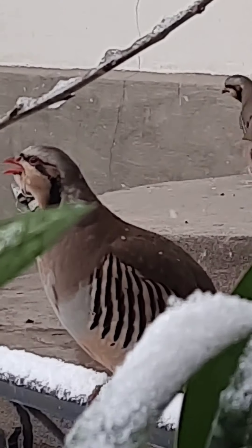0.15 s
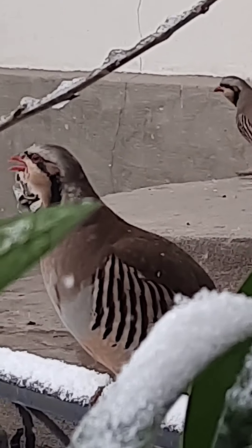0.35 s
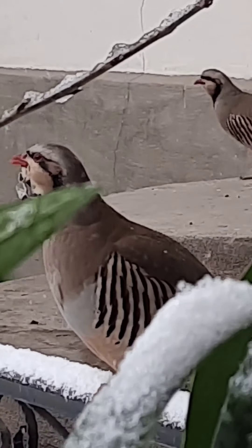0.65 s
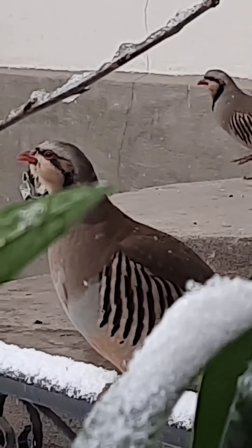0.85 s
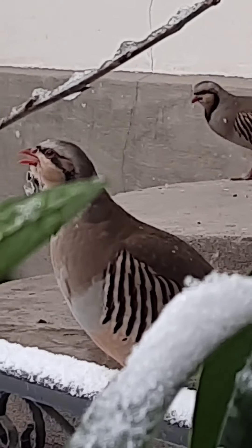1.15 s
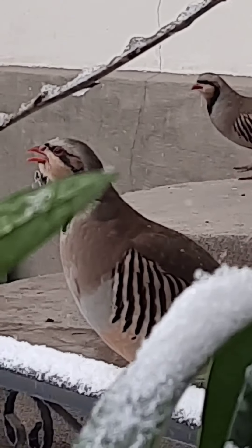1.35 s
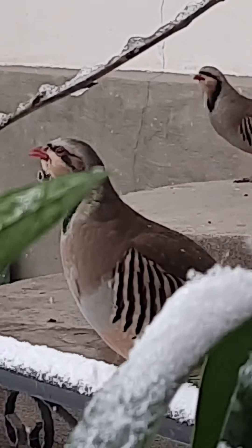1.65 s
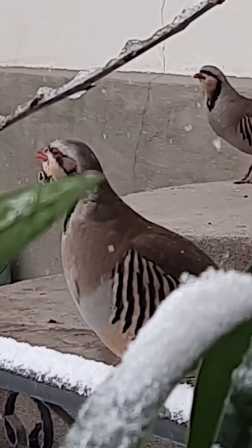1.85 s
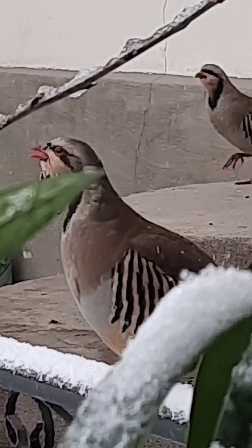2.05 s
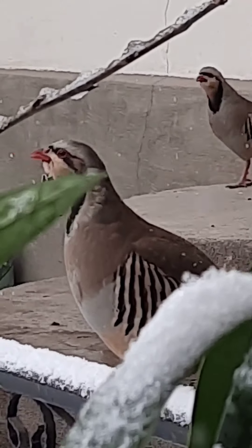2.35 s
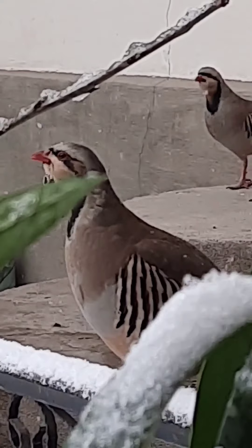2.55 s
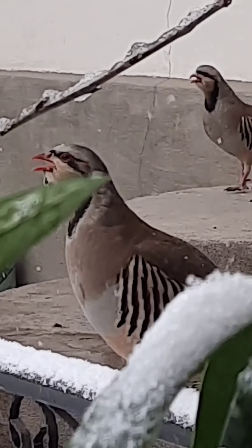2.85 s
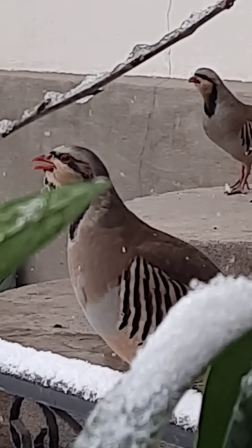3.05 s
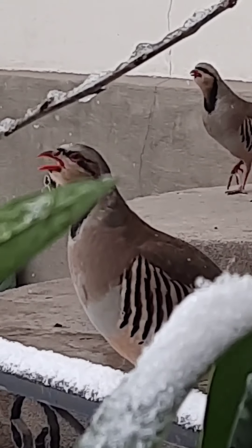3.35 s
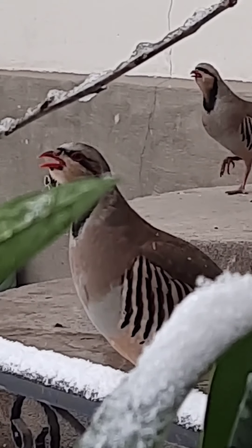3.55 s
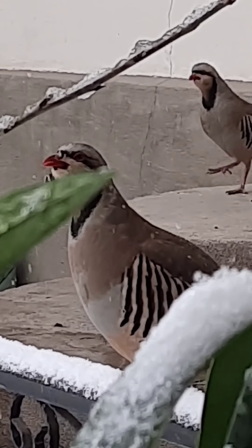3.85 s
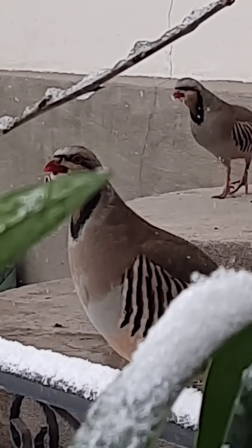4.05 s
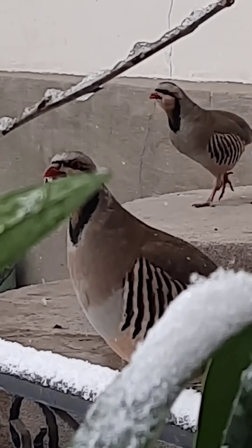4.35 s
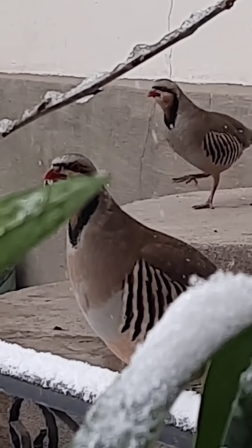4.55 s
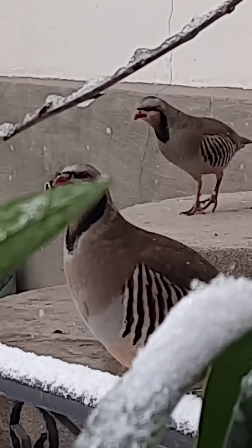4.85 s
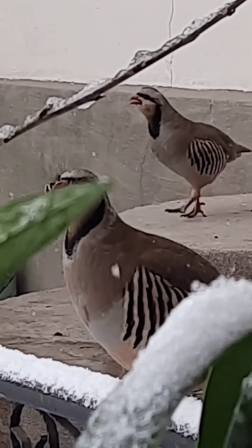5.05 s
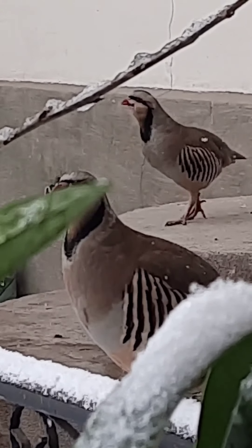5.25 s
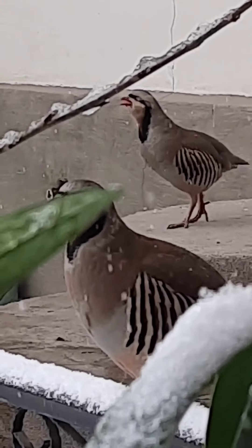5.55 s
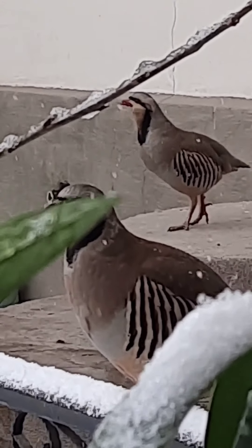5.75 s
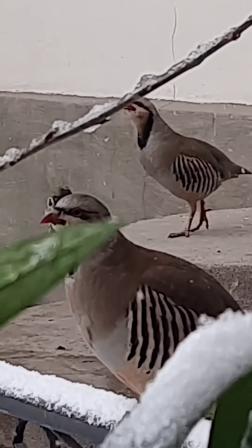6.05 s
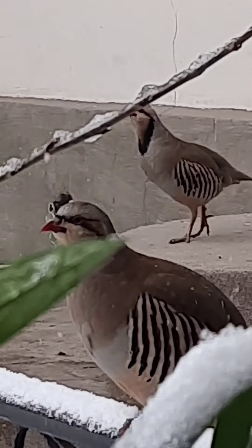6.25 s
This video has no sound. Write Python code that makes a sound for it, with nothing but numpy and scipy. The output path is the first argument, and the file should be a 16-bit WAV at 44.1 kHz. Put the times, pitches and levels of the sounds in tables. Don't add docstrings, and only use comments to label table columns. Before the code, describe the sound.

Outdoors in a snowy, concrete-walled yard, a partridge very near the microphone clucks fast and regularly, starting mid-call with harsh and hoarse chuks, then mixing in clear, whistly double notes. A second partridge farther off joins from about 1.7 seconds, lower and duller. The near bird stops around 4.4 seconds; the distant one continues alone to the end with faint small-bird chirps. Walls return short echoes over a very quiet low rumble.

```python
import sys
import numpy as np
from scipy import signal
from scipy.fft import rfft, irfft, next_fast_len
from scipy.io import wavfile
from scipy.ndimage import uniform_filter1d

SR = 44100
rng = np.random.default_rng(int(sys.argv[2]) if len(sys.argv) > 2 else 0)


def makeup_ratio(level_db):
    decades = np.asarray(level_db, float) / 20
    return 10 ** decades


def persist_wave(psi):
    counts = np.round(np.clip(psi, -1, 1) * 32767).astype(np.int16)
    wavfile.write(sys.argv[1], SR, np.atleast_2d(counts).T)


N = 282316
LEAD = 8192

# start_s [s], effort_db [dB], length_s [s], beak [throat factor], pitch_hz [Hz]
CLEAR_NOTES = [
    (1.2343, -13.5, 0.039, 1.05, 628),
    (1.6465, -14, 0.03, 1.04, 625),
    (2.0988, -12.5, 0.031, 1.1, 625.8),
    (2.5319, -12, 0.031, 1.16, 625.5),
    (2.966, -12.5, 0.036, 1.146, 624.7),
    (3.411, -15, 0.036, 1.033, 616),
    (3.8696, -12, 0.04, 1.11, 606),
    (4.3154, -10.5, 0.025, 1.15, 622),
]
# start_s [s], effort_db [dB], length_s [s], beak [factor], pitch_hz [Hz]
SECOND_PUSHES = [
    (1.2805, -17.5, 0.036, 0.95, 611),
    (1.705, -29.5, 0.055, 0.98, 596),
    (2.155, -18.5, 0.034, 0.93, 610.4),
    (2.584, -12, 0.032, 1.1, 634.6),
    (3.025, -11.5, 0.025, 1.097, 621),
    (3.473, -19, 0.0279, 1.04, 607.5),
    (3.933, -18, 0.023, 0.87, 615.6),
    (4.3676, -9.5, 0.019, 1.15, 604),
]
# start_s [s], effort_db [dB], length_s [s], beak [throat factor], pitch_hz [Hz]
HOARSE_NOTES = [
    (0.483, -15, 0.045, 1.067, 631),
    (0.672, -14.5, 0.04, 1.06, 635),
    (0.8592, -13.5, 0.038, 1.1, 633.7),
    (1.056, -14, 0.029, 0.99, 637.4),
    (1.478, -14.5, 0.0304, 1.03, 629),
    (1.741, -12.5, 0.027, 1.06, 642),
    (3.5, -14, 0.022, 1.16, 645),
]
# start_s [s], effort_db [dB], length_s [s], beak [throat factor], pitch_hz [Hz]
HARSH_NOTES = [
    (-.088, -13, 0.045, 1.004, 643),
    (0.1162, -13.5, 0.034, 1.01, 627),
    (0.294, -13.5, 0.043, 1.046, 632.5),
    (1.925, -12, 0.02, 1.19, 635.7),
    (2.366, -11, 0.021, 1.12, 636.3),
    (2.797, -12, 0.026, 1.113, 653),
    (3.236, -12, 0.0195, 1.07, 649),
    (3.697, -10.5, 0.016, 1.126, 634),
    (4.14, -9, 0.016, 1.147, 646.3),
]
# centre_hz [Hz], width_hz [Hz], level_db [dB]; brightness acts from the third on
NEAR_RESONANCES = [(1832, 373, 4), (1140, 1200, -18.5), (4740, 864, -9), (2448, 413, -4.5),
                   (3146, 82, -14.5), (8290, 1330, -34), (10360, 610, -33), (13550, 810, -30.5),
                   (621, 240, -10.5)]
# start_s [s], effort_db [dB], length_s [s], brightness_db [dB], pitch_hz [Hz]
FAR_ANSWERS = [(1.6962, -30, 0.027, -11, 544), (1.971, -31.5, 0.03, -9.5, 547),
               (2.2496, -34, 0.04, -6, 544.6), (2.445, -31.5, 0.022, -3, 479.5),
               (2.729, -34.5, 0.038, -3, 477), (2.948, -35, 0.034, -1, 464),
               (3.129, -40.5, 0.092, -5.5, 484.3), (3.234, -33, 0.058, -6.5, 516.6),
               (3.457, -30, 0.033, -3.5, 480.7), (3.733, -30.5, 0.04, -6, 481),
               (3.946, -26.5, 0.023, -4.5, 496), (4.156, -33.5, 0.033, -4.5, 477.5),
               (4.243, -32, 0.037, 0.5, 495.5), (4.459, -33, 0.04, -2.5, 502),
               (4.748, -29.5, 0.044, -2, 537), (4.954, -31, 0.047, -4, 515.6),
               (5.233, -30.5, 0.022, -13, 460), (5.2647, -32.5, 0.033, 0.5, 472.7),
               (5.492, -30.5, 0.0484, -2.5, 518.7), (5.723, -31.5, 0.046, -9.5, 490),
               (5.818, -34.5, 0.047, 2, 472.5), (6.043, -31, 0.054, -1.5, 492.2),
               (6.154, -34, 0.039, -26, 482.4), (6.1915, -33.5, 0.054, -14, 483.2),
               (6.277, -44.5, 0.024, 5, 465), (6.358, -36.5, 0.089, 9, 521.4),
               (6.386, -27.5, 0.041, -6, 528)]
# start_s [s], effort_db [dB], length_s [s], brightness_db [dB], pitch_hz [Hz]
FAR_LEAD_INS = [
    (3.648, -36, 0.024, 0.5, 565.4),
    (4.6616, -38, 0.029, -0.5, 558.7),
    (5.174, -38.5, 0.037, -2, 548.5),
    (5.99, -34.5, 0.023, -9, 612),
]
# centre_hz [Hz], width_hz [Hz], level_db [dB]; brightness acts from the third on
FAR_RESONANCES = [(1456, 351, 4), (636, 500, -26), (3650, 460, 0.5), (2440, 110, -8.5), (5500, 1230, -10.5),
                  (8500, 600, -26.5), (11460, 1380, -24.5)]
# start_s [s], level_db [dB], length_s [s], first_pitch_hz [Hz], last_pitch_hz [Hz]
SMALL_BIRD_CHIRPS = [
    (4.052, -47, 0.02, 5070, 4223),
    (4.769, -45.5, 0.044, 4870, 4350),
    (5.229, -46, 0.032, 4910, 4410),
    (5.402, -53.5, 0.025, 5000, 4240),
    (5.86, -53, 0.063, 4720, 4420),
    (6.161, -47.5, 0.045, 5020, 4280),
]
# frequency_hz [Hz], left_minus_right_db [dB]
NEAR_BALANCE = [(60, 8), (110, 16), (200, -24), (380, -3), (700, -1.5), (1280, 0.5), (2370, -7.5),
                (4370, -5), (8050, -2), (14900, 45)]
# frequency_hz [Hz], left_minus_right_db [dB]
FAR_BALANCE = [(60, -21), (110, -24), (200, 92), (380, -9.5), (700, 6.5), (1280, -4), (2370, -7.5),
               (4370, -0.5), (8050, -2.5), (14900, 56)]
# delay_s [s], left_db [dB], right_db [dB]
WALL_ECHOES = [(.004, 16, 0.5), (.009, 6.5, 14), (0.016, 7.5, 8), (0.022, 12, 10.5), (0.046, -4, 0)]
# frequency_hz [Hz], t60_s [s]
YARD_DECAY = [(300, 0.41), (1000, 1), (2000, 0.72), (4000, 0.71), (8000, 0.63), (14000, 0.37)]
# time_s [s], level_db [dB]
RUMBLE_SWELL = [(0.0, -59), (0.03, -70.5), (1.66, -73), (2.011, -67), (2.28, -72), (3.64, -73),
                (3.69, -44.5), (4.22, -67), (4.299, -104), (4.401, -70), (5.47, -75), (5.781, -55),
                (5.88, -67), (6.08, -54.5), (6.22, -68), (6.4, -60)]
# frequency_hz [Hz], density_db [dB per Hz]
RUMBLE_SPECTRUM = [(12, -77), (25, -37), (76, 1.5), (95, -9), (115, -16.5), (147, -8), (226, -23),
                   (260, -43), (340, -91), (570, -120)]
# frequency_hz [Hz], density_db [dB per Hz]
AIR_SPECTRUM = [(120, -90), (200, -27), (540, -19), (734, -12.5), (1430, -28), (2750, -29), (3600, -22),
                (8260, -47), (9380, -83), (15000, -104)]


def near_bird():
    clear = dict(roughness=.04, jitter=.006, sharp=.04, whistle_db=4.5, rise_s=.004, attack_s=0.0012,
                 closing=0.087, croak_db=-7, lead_s=.0005, settle_s=0.0086, tick_db=-31)
    second = dict(roughness=.08, jitter=.01, sharp=-.11, whistle_db=-22, rise_s=0.0034, attack_s=0.0062,
                  closing=0.1, croak_db=4.5, lead_s=0.008, settle_s=0.00803)
    hoarse = dict(roughness=.22, jitter=.02, sharp=.06, whistle_db=7.0, rise_s=0.00617, attack_s=0.00061,
                  closing=0.31, croak_db=1.0, lead_s=.004, settle_s=0.0082, tick_db=-10.5)
    harsh = dict(roughness=.33, jitter=.04, sharp=.1, whistle_db=4.5, rise_s=0.0032, attack_s=0.00027,
                 closing=0.14, croak_db=1.5, lead_s=0.0037, settle_s=0.00958, tick_db=-6)
    # notes, whistle as a multiple of the pitch, brightness in dB with the beak at rest, voice
    kinds = [(CLEAR_NOTES, 3.036, 0.75, clear), (SECOND_PUSHES, 3.036, 0.75, second),
             (HOARSE_NOTES, 3.1, 0, hoarse), (HARSH_NOTES, 3.065, -2.53, harsh)]
    calls = np.zeros(N + LEAD)
    for notes, partial, rest_bright_db, voice in kinds:
        for row in notes:
            add(calls, *chuk(near_posture(row, partial, rest_bright_db), NEAR_RESONANCES, **voice))
    for _ in range(2):
        calls = signal.lfilter(*signal.iirnotch(3560, 3, SR), calls)
    return makeup_ratio(-2.0) * heard(calls, NEAR_BALANCE, lead_ms=0.11, walls_db=-15.5, wet_db=-0.5)


def near_posture(row, partial, rest_bright_db):
    start_s, effort_db, length_s, beak, pitch_hz = row
    bright_db = rest_bright_db - 15 * (beak - 1)
    return start_s, effort_db, length_s, pitch_hz, beak, bright_db, partial


def chuk(posture, throat, roughness, jitter, sharp, whistle_db, rise_s, attack_s, closing, croak_db,
         lead_s, settle_s, sag=6.5, tick_db=-40):
    start_s, effort_db, length_s, pitch_hz, beak, bright_db, partial = posture
    t = np.arange(5000) / SR
    after = t - rise_s

    broken = np.clip((after - length_s) / 0.023 + .5, 0, 1)
    rough = roughness + (.42 - roughness) * broken
    wobble, air = rng.standard_normal((2, len(t)))
    wobble = evened(uniform_filter1d(wobble, size=90))
    falling = 1 - sag * np.maximum(after - 0.73 * length_s, 0)
    bend = sharp * np.exp(-t / settle_s)
    pitch = falling + bend + (jitter + .04 * broken) * wobble
    turns = np.cumsum(pitch_hz * pitch) / SR

    partials = [np.cos(2 * np.pi * k * turns) / (1 + (k * pitch_hz / 4000) ** 8) for k in range(1, 12)]
    pulses = evened(sum(partials))
    puffs = evened((0.85 + np.exp(-(turns % 1) / 0.19)) * air)

    croak_s = .04
    ending = np.clip((rise_s + length_s + croak_s - t) / 0.03, 0, 1)
    fade = np.exp(-.7 * t / length_s) * makeup_ratio(croak_db * broken) * ending
    push = np.clip(after / attack_s, 0, 1) * fade
    drive = push * ((1 - rough) * 0.23 * pulses + rough * puffs)
    hiss = push ** 0.54 * (0.097 * pulses + 0.21 * puffs)
    hiss = hiss + makeup_ratio(tick_db) * air * (t > rise_s) * np.exp(-abs(after) / 0.0016)

    opening = beak * (1 + closing * (np.exp(-t / 0.025) - .4)) * np.maximum(falling, .2) ** .17
    voice = np.zeros(len(t))
    for k, (centre_hz, width_hz, level_db) in enumerate(throat):
        if k < 2:
            follow = 1
        elif centre_hz < 4000:
            follow = .4
        else:
            follow = .25 if centre_hz < 5200 else .1
        source = drive if centre_hz < 4000 else hiss
        gain = (-1) ** k * makeup_ratio(level_db + (k > 1) * bright_db)
        voice += gain * ring(source, centre_hz * opening ** follow, width_hz)

    swell = np.clip(t / rise_s, 0, 1) ** 2 * np.exp(-np.maximum(after, 0) / 0.0011)
    whistle_turns = partial * pitch_hz * np.cumsum(1 + 0.95 * bend) / SR
    whistle = swell * np.sin(2 * np.pi * whistle_turns)
    return start_s - lead_s, makeup_ratio(effort_db) * (4.77 * voice + makeup_ratio(whistle_db) * whistle)


def ring(x, centre_hz, width_hz):
    turn = np.exp(2j * np.pi * np.cumsum(centre_hz) / SR)
    r = np.exp(-np.pi * 1.55 * width_hz / SR)
    smooth = signal.lfilter([(1 - r) ** 2], [1, -2 * r, r ** 2], x / turn)
    return 2 * (turn * smooth).real


def far_bird():
    voice = dict(roughness=.2, jitter=.02, sharp=.07, sag=3.424)
    answer = dict(voice, whistle_db=-9.5, rise_s=0.0033, attack_s=0.0061, closing=0.18, croak_db=4.0,
                  lead_s=.009, settle_s=0.03127)
    lead_in = dict(voice, whistle_db=2.5, rise_s=0.0057, attack_s=0.0085, closing=.02, croak_db=-0.5,
                   lead_s=0.013, settle_s=0.0157)
    calls = np.zeros(N + LEAD)
    for row in FAR_ANSWERS:
        add(calls, *chuk(far_posture(row), FAR_RESONANCES, **answer))
    for row in FAR_LEAD_INS:
        add(calls, *chuk(far_posture(row, shut=0.805), FAR_RESONANCES, **lead_in))
    calls = signal.lfilter(*signal.iirnotch(1000, 7, SR), calls)
    for row in SMALL_BIRD_CHIRPS:
        add(calls, *small_bird(row))
    return makeup_ratio(3.0) * heard(calls, FAR_BALANCE, lead_ms=0.13, walls_db=-9, wet_db=6.5)


def far_posture(row, shut=None):
    start_s, effort_db, length_s, bright_db, pitch_hz = row
    effort_opening = 1 + .014 * np.clip(effort_db + 29, -6, 5)
    beak = effort_opening * (pitch_hz / 534) ** 0.26
    return start_s, effort_db, length_s, pitch_hz, shut or beak, bright_db, 2 if shut else 3.0


def small_bird(row):
    start_s, level_db, length_s, first_hz, last_hz = row
    u = np.linspace(0, 1, round(length_s * SR))
    flutter_hz = 220 * np.sin(2 * np.pi * 110 * length_s * u)
    pitch_hz = first_hz + (last_hz - first_hz) * u + flutter_hz
    swell = np.sin(np.pi * u ** 1.76)
    return start_s, makeup_ratio(level_db) * swell * np.sin(2 * np.pi * np.cumsum(pitch_hz) / SR)


def heard(x, balance, lead_ms, walls_db, wet_db):
    size = next_fast_len(len(x) + SR // 4)
    hz = np.fft.rfftfreq(size, 1 / SR)
    paths = np.ones((2, len(hz)), complex)
    for delay_s, *echo_db in WALL_ECHOES:
        port_s = delay_s + rng.uniform(0, 0.00031, (2, 1))
        paths += makeup_ratio(np.add(echo_db, walls_db))[:, None] * np.exp(-2j * np.pi * hz * port_s)
    x = signal.sosfilt(signal.butter(4, 330, "high", fs=SR, output="sos"), x)

    difference_db = np.clip(read(balance, hz), -11, 7)
    ports = makeup_ratio(difference_db * np.array([[.5], [-.5]]))
    ports = ports * np.exp(-2j * np.pi * hz * np.array([[0], [lead_ms / 1000]]))

    exchange_s = 1.3
    phase = np.arange(len(x)) / SR / exchange_s + np.arange(3)[:, None] / 3
    turns = np.sqrt(2 / 3) * np.cos(np.pi * phase)
    tail = sum(yard(x * turn) for turn in turns)
    z = rfft(x, size) * paths + makeup_ratio(wet_db) * rfft(tail, size)
    return irfft(z * ports, size)[:, LEAD:LEAD + N]


def yard(x):
    taps = np.zeros((2, SR))
    at = np.arange(300, SR - 90, 90) + rng.integers(0, 90, (2, (SR - 301) // 90))
    np.put_along_axis(taps, at, rng.laplace(0, 1, at.shape), 1)
    hz, t, z = signal.stft(taps, SR, nperseg=256)
    shared = np.clip(0.32 + .5 / (1 + (hz[:, None] / 450) ** 2), 0, 1)
    z[1] = shared * z[0] + np.sqrt(1 - shared ** 2) * z[1]
    decay = makeup_ratio(-60 * t / read(YARD_DECAY, hz)[:, None])
    tail = signal.istft(z * decay, SR, nperseg=256)[1]
    return signal.fftconvolve(x[None], tail / np.linalg.norm(tail[0]), axes=1)[:, :len(x)]


def thump():
    start_s, level_db, pitch_hz, t60_s = 3.665, -42, 95, .5
    t = np.maximum(np.arange(N) / SR - start_s, 0)
    return makeup_ratio(level_db - 60 * t / t60_s) * np.clip(t / 0.014, 0, 1) * np.sin(2 * np.pi * pitch_hz * t)


def background():
    t = np.arange(N) / SR
    time_s, level_db = np.transpose(RUMBLE_SWELL)
    size = round(.05 * SR)
    bumps = uniform_filter1d(rng.standard_normal(N), size)
    bumps = evened(uniform_filter1d(bumps, size))
    rumble_db = np.interp(t, time_s, level_db) + 7 * np.minimum(bumps, .6) + 3.0
    low = makeup_ratio(rumble_db) * noise(RUMBLE_SPECTRUM, same=0.81)
    snow = noise([(100, -37), (150, -17), (320, -4), (500, -45)], same=.8)
    low += makeup_ratio(-51 - 60 * abs(t - 3.77) / .25) * snow
    return low * makeup_ratio(np.array([[-2.1], [2.1]])) + makeup_ratio(-53) * noise(AIR_SPECTRUM, same=0.94)


def noise(spectrum, same):
    a, b = rng.standard_normal((2, N))
    same = np.clip(same, 0, 1)
    z = rfft(np.array([a, same * a + np.sqrt(1 - same ** 2) * b]))
    return evened(irfft(z * makeup_ratio(read(spectrum, np.fft.rfftfreq(N, 1 / SR))), N))


def evened(x):
    return x / np.sqrt(np.mean(x ** 2) + 1e-20)


def read(points, hz):
    f, value = np.transpose(points)
    return np.interp(np.log(hz + 1), np.log(f + 1), value)


def add(mix, start_s, sound):
    part = mix[round(start_s * SR) + LEAD:][:len(sound)]
    part += sound[:len(part)]


def scene():
    return near_bird() + far_bird() + background() + thump()


def low_pass(x):
    return signal.sosfilt(signal.butter(12, 14860, fs=SR, output="sos"), x)


def record(dry):
    bass = signal.sosfiltfilt(signal.butter(4, 240, fs=SR, output="sos"), dry)
    power = uniform_filter1d((dry ** 2).mean(0), size=3000)
    level_db = 10 * np.log10(abs(power) + 1e-12)
    duck_db = 5 * np.maximum(level_db + 21.5, 0)
    ducked = dry - bass * (1 - makeup_ratio(-duck_db))
    thin = signal.lfilter(*signal.iirnotch(190, .9, SR), ducked)
    edged = signal.sosfilt(signal.butter(16, 14800, fs=SR, output="sos"), thin)
    return low_pass(edged)


dry = scene()
out = record(dry)
persist_wave(out)
```